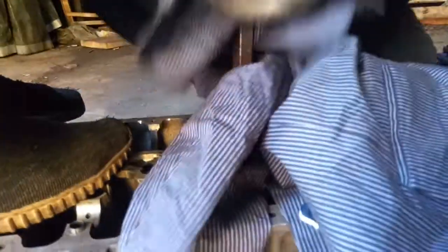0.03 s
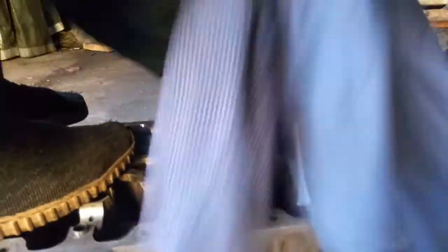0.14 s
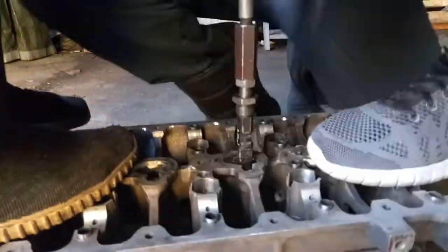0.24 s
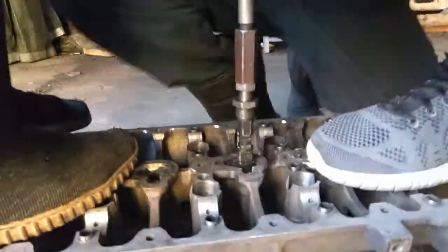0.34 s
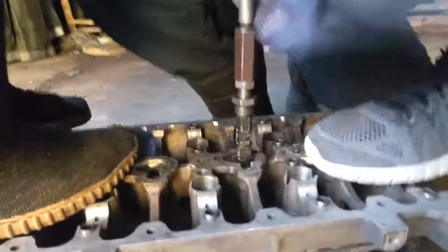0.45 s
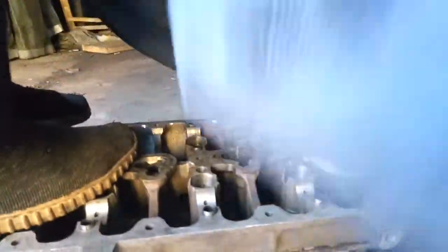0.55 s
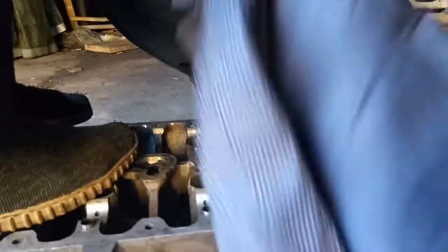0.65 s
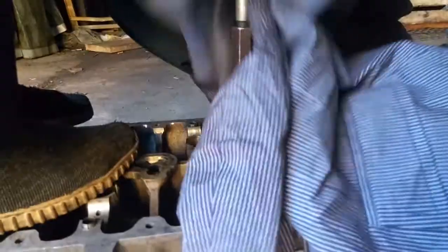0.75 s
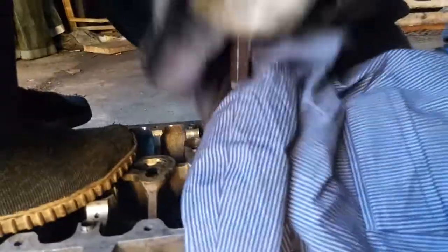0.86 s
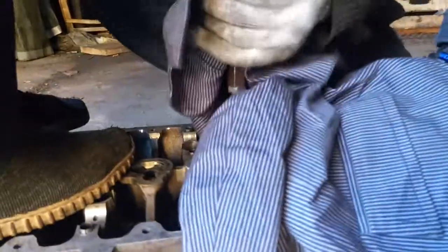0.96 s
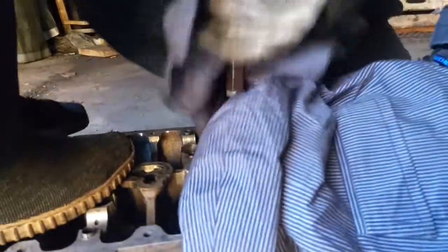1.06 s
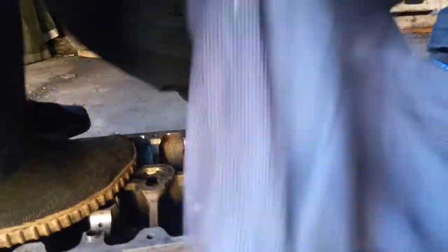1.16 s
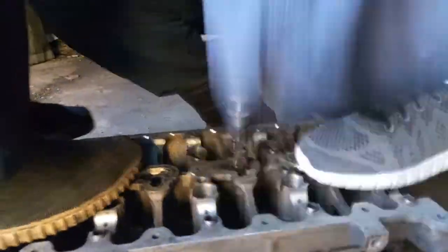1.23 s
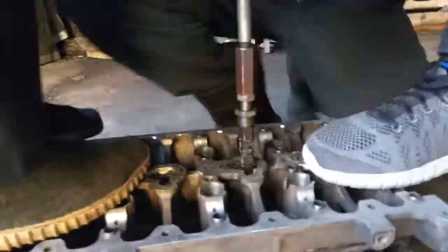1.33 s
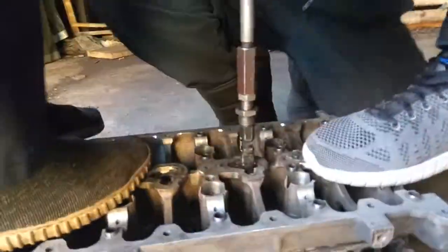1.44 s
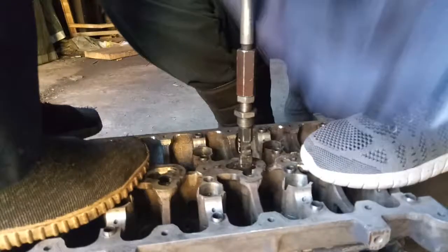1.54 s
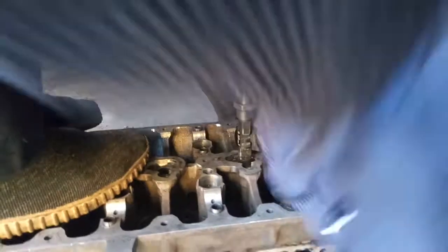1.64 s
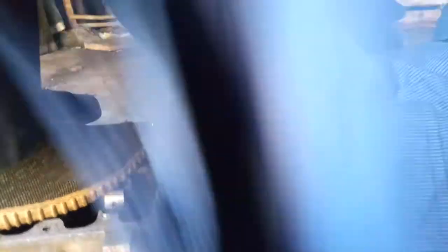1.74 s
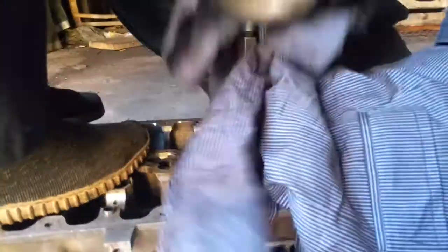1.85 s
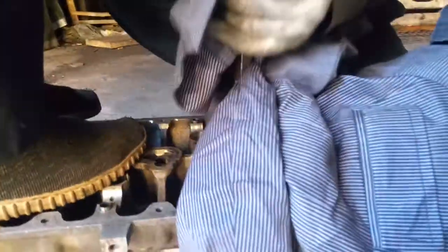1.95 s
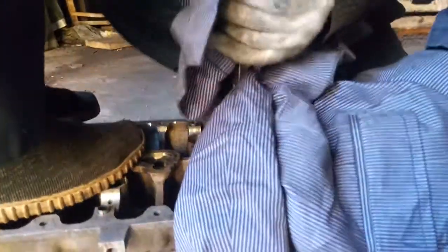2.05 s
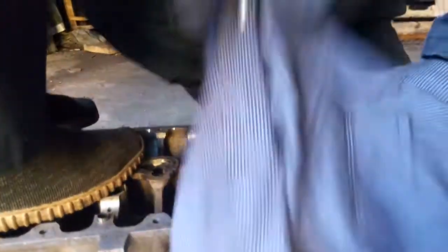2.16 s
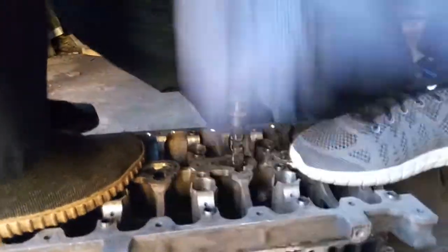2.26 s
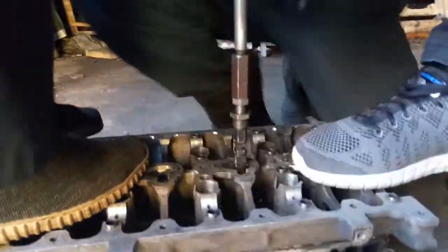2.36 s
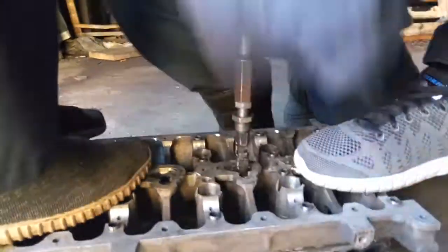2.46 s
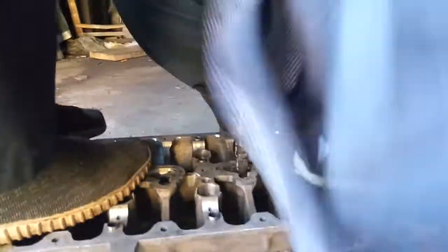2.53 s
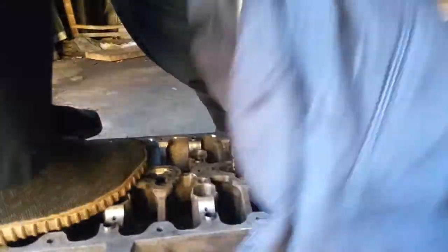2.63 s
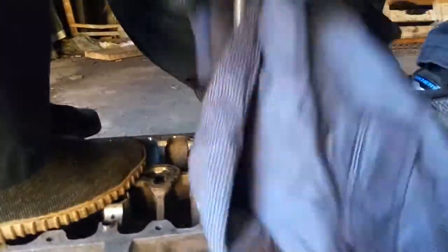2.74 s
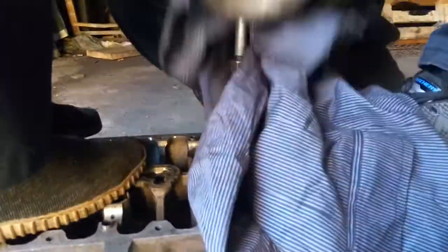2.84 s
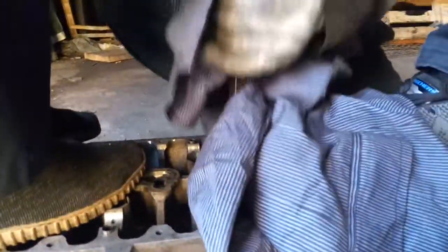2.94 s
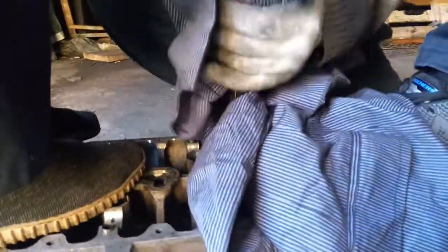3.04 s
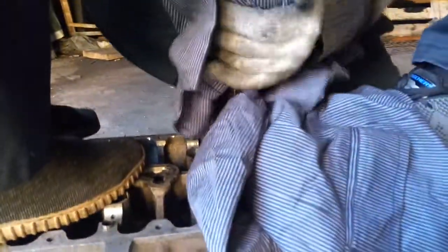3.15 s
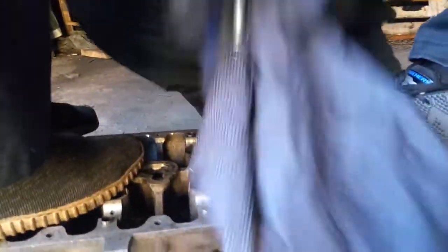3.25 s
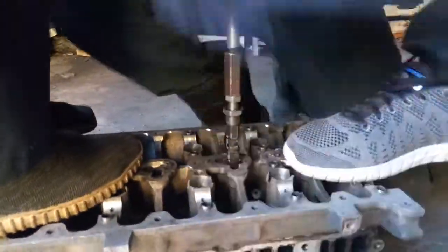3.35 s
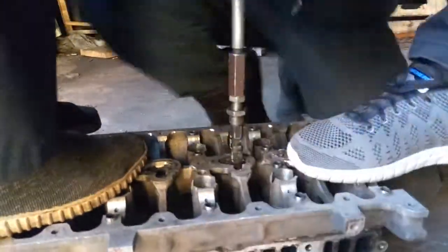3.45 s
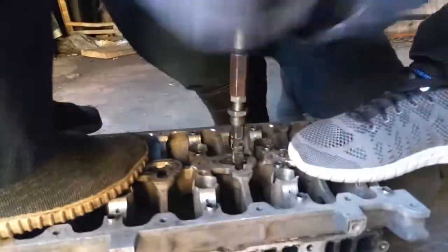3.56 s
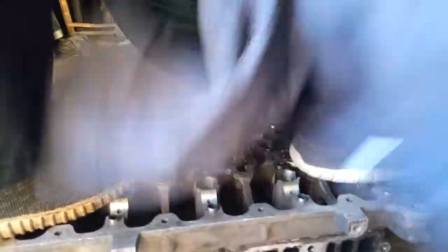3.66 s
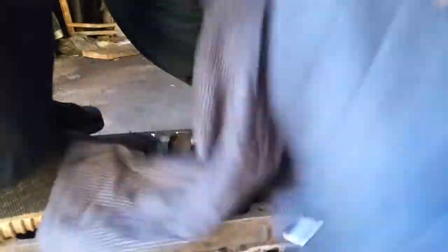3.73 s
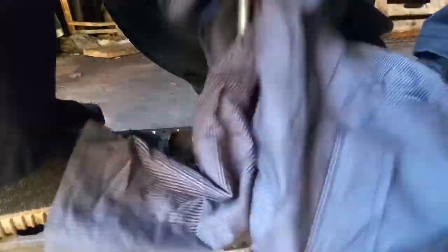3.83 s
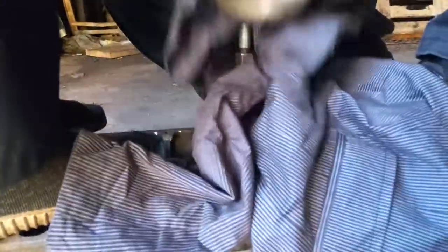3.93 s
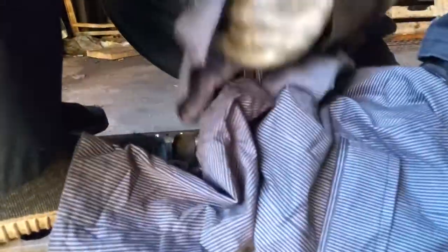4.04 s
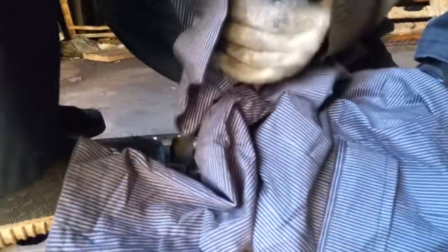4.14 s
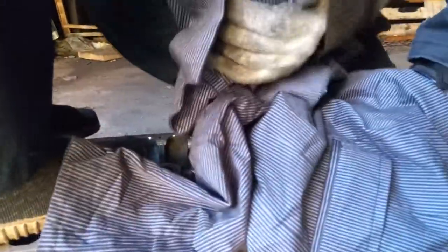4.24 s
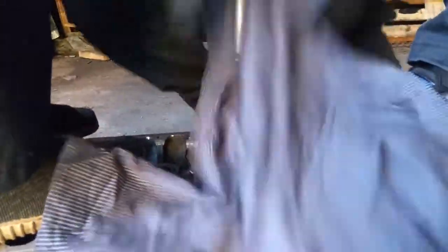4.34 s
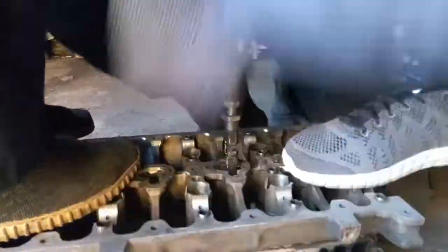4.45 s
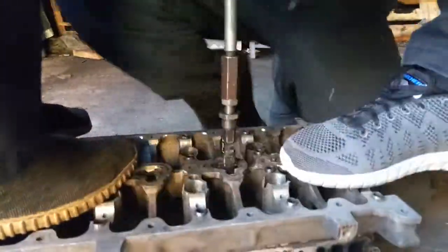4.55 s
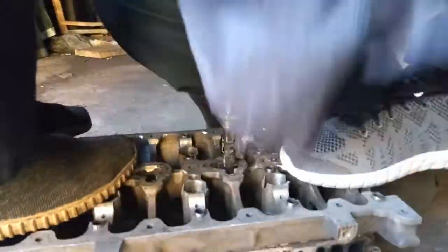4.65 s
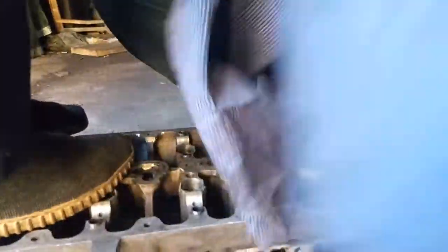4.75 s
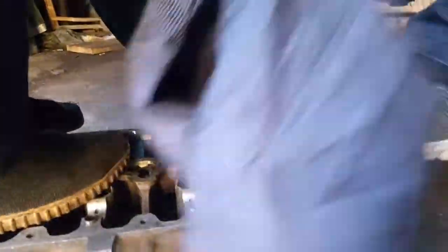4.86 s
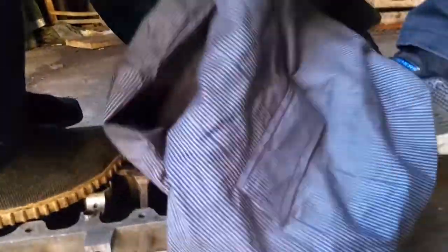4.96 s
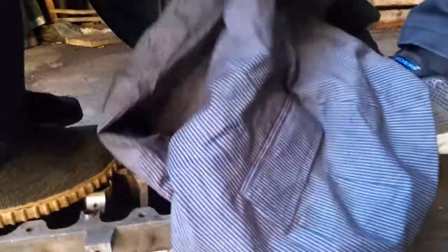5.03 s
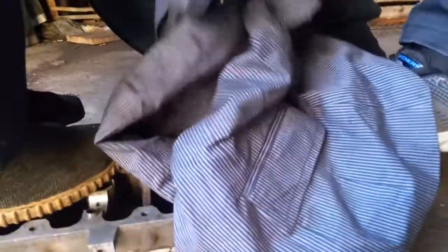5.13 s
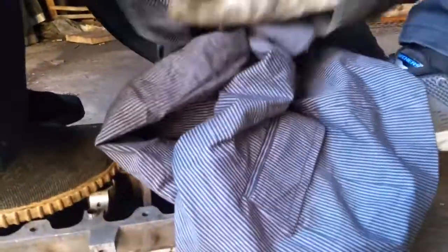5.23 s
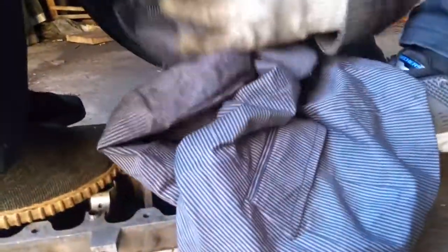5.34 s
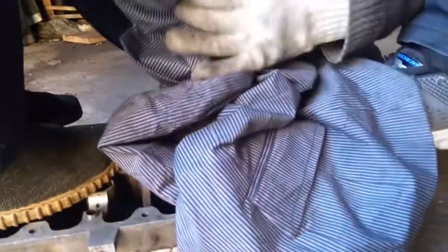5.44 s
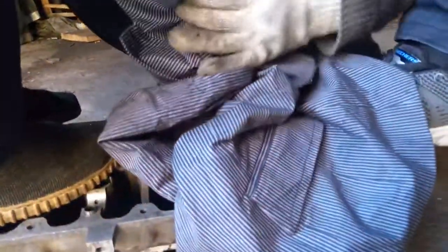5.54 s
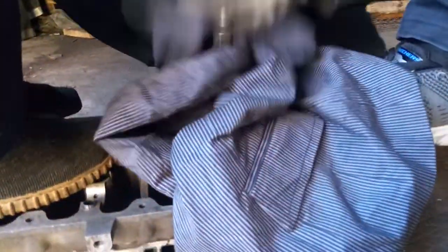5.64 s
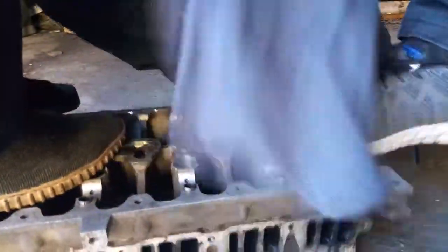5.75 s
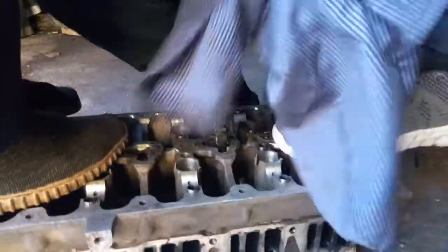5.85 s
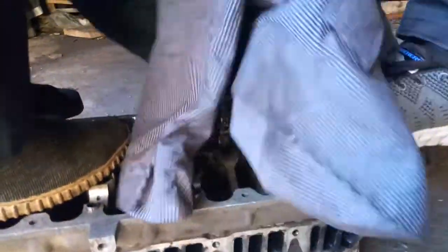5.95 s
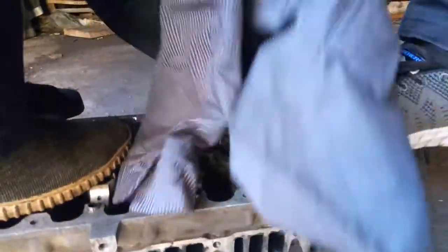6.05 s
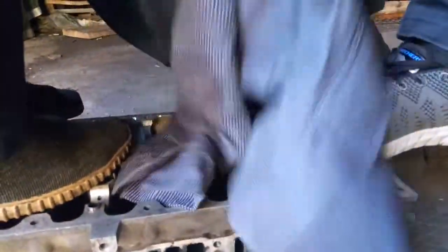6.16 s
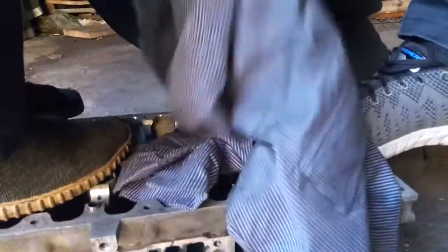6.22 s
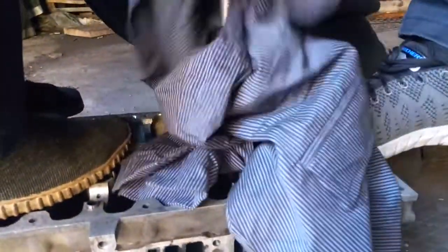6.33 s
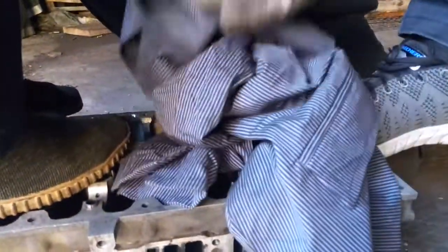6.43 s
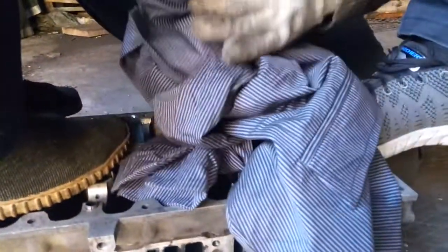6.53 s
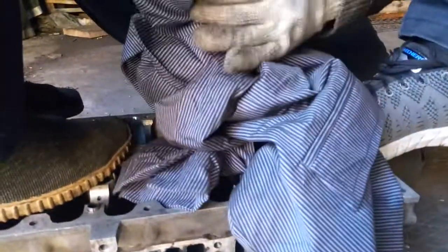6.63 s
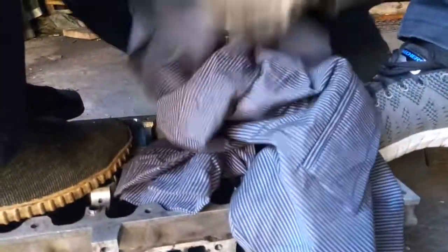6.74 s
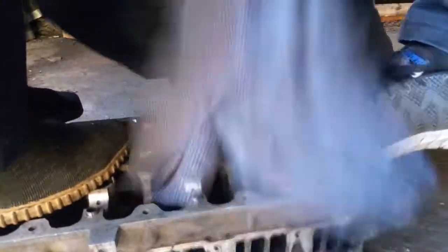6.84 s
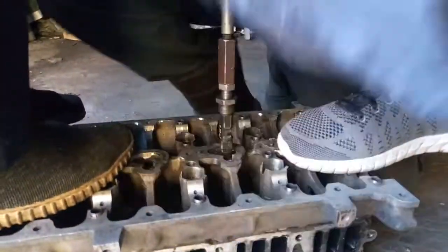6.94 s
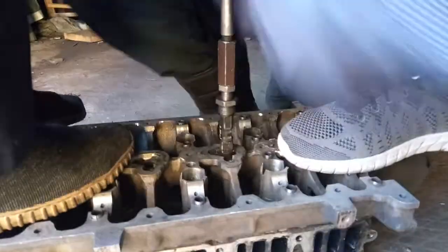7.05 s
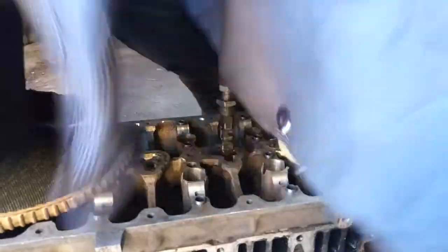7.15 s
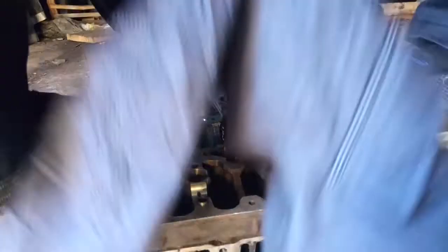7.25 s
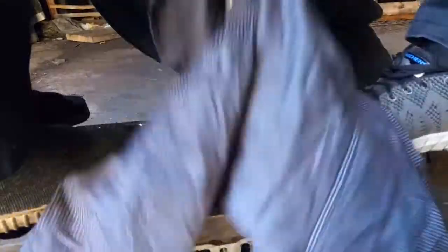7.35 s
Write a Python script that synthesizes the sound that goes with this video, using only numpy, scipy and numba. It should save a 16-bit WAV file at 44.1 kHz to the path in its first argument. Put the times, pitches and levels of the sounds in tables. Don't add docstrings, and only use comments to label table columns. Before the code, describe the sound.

An earlier blow is still fading in a reverberant workshop as cloth rustles close by. At 0.13 s a steel weight scrapes up a rod, knocking and rising in pitch, and slams its stop at 0.27 s: a bright, overloaded crack, a clack about 0.05 s later, ringing steel and echo. A low thud follows at 0.5 s, then the weight slides back with clinks and a falling metallic note. Further slams land near 1.3, 2.3, 3.4, 4.5, 5.8 and 6.9 s; the second is brightest, the fourth duller, the fifth fuller with the loudest clack, the sixth thin and long-ringing, the last softer with longer chatter. A dry snap comes at 3.6 s, faint motor hum swells around 4 s, and a knock and thud sound at 6.4 s. The phone's level drops after each strike; the final slide rattles down until about 7.4 s.

```python
import sys
import numpy as np
from scipy import signal
from scipy.fft import rfft, irfft
from scipy.io import wavfile
from scipy.ndimage import uniform_filter1d
from numba import njit

SR = 44100
rng = np.random.default_rng(int(sys.argv[2]) if len(sys.argv) > 2 else 0)


def unload_wav(signal):
    wavfile.write(
        sys.argv[1],
        SR,
        np.round(np.clip(np.atleast_2d(signal).T, -1, 1) * 32767).astype(np.int16),
    )


def volts_from_decibels(level):
    exponent = np.asarray(level, float) / 20
    return 10 ** exponent


N = 325897
T = np.arange(N) / SR

# t/s, peak level/dB, bass re peak/dB, treble re peak/dB, rebound chatter/s
BLOWS = [
    (0.2689, -6.5, -19.5, -8.5, 0.028),
    (1.307, -6, -28, -6, 0.027),
    (2.336, -5, -31.5, -9.5, 0.019),
    (3.404, -6, -26.5, -30, 0.025),
    (4.496, -5.5, -21.5, -18, 0.027),
    (5.834, -6, -37, -18.5, 0.028),
    (6.94, -8, -21.5, -20.5, 0.05),
]
# start t/s, travel/s, rub level at the stop/dB, singing level/dB, singing from t/s
THROWS = [
    (.126, 0.12, -17, 2.5, 0.17),
    (1.167, 0.13, -16.5, 5.5, 1.19),
    (2.209, 0.1, -10.5, 8, 2.17),
    (3.27, 0.11, -17, 10, 3.23),
    (4.375, .093, -9.5, 9.5, 4.378),
    (5.693, 0.12, -17, 1.5, 5.735),
    (6.808, 0.1, -14, 6.5, 6.8),
]


def read(points, hz):
    points = np.array(points)
    return np.interp(np.log(np.maximum(hz, 1)), np.log(points[:, 0]), points[:, 1])


def unit(x):
    return x / np.sqrt(np.mean(x ** 2))


def noise(points, size=N):
    colour = volts_from_decibels(read(points, np.fft.rfftfreq(size, 1 / SR)))
    return unit(irfft(rfft(rng.standard_normal(size)) * colour, size))


def walk(rate):
    k = int(SR / rate)
    held = np.repeat(rng.standard_normal(N // k + 1), k)
    return unit(uniform_filter1d(held, k)[:N])


def fade(s, t60, rise=0.00078):
    age = np.maximum(T - s, 0)
    return (1 - np.exp(-age / rise)) * np.exp(-np.log(1000) * age / t60)


def swell(s, length):
    return np.sin(np.pi * np.clip((T - s) / length, 0, 1))


def tone(hz, phase=0):
    return np.sin(2 * np.pi * hz * T + phase)


@njit
def ring(x, hz, t60):
    y, z, r = np.empty(len(x)), 0j, np.exp(-np.log(1000) / (t60 * SR))
    for i in range(len(x)):
        w = 2 * np.pi * hz[i] / SR
        z = z * r * complex(np.cos(w), np.sin(w)) + x[i]
        y[i] = z.imag
    return y


@njit
def follow(x, attack, release):
    y, e = np.empty(len(x)), 1e-6
    for i in range(len(x)):
        e += (abs(x[i]) - e) * (attack if abs(x[i]) > e else release)
        y[i] = e
    return y


def chatter_decay():
    return [volts_from_decibels(db) * np.exp(-(np.maximum(T - s, 0) / chatter_s) ** 1.14) * fade(s - .0004, 0.62, 0.00011)
            for s, db, _, _, chatter_s in BLOWS]


def crack(shape):
    # f/Hz, level per Hz/dB
    crack_tone = [(35, -39.5), (60, -10), (469, -3.5), (1140, -4), (1470, -3), (2250, -7), (3670, -8.5),
                  (4030, -10.5), (5090, 0.5), (6280, 1), (7750, -10.5), (8510, -9), (13600, -16.5),
                  (14900, -9), (16000, -54)]
    treble_tone = [(6000, -37.0), (8000, -10.0), (9500, 1.5), (11000, -7), (13000, -25.0), (15500, 5.0),
                   (16000, -18.0)]
    chatter = volts_from_decibels(4.5 * walk(450))
    first = sum(volts_from_decibels(row[1] - 2.0) * fade(row[0] - .0004, 0.018, 0.00017) for row in BLOWS)
    body = volts_from_decibels(-2.2) * noise(crack_tone) * (chatter * sum(shape) + first)
    treble = noise(treble_tone) * sum(volts_from_decibels(row[3] - 1.0) * e for row, e in zip(BLOWS, shape))
    return body + treble


def face_notes():
    # t/s, f/Hz, level/dB, t60/s
    face_modes = [(0.27, 5870, -6.5, 0.15), (.27, 5260, -12, 0.089), (1.307, 5560, -10.5, .07),
                  (2.338, 5550, -10, .06), (2.338, 4990, -10.5, .07), (3.406, 6310, -8, .06),
                  (4.497, 6460, -11.5, 0.065), (4.499, 5250, -11, .05), (5.838, 6450, -7, .07),
                  (5.837, 5250, -12, .08), (6.941, 5185, -7, 0.11), (3.408, 3705, -16, 0.19),
                  (3.416, 4850, -13, 0.118), (1.315, 4850, -12, 0.13), (4.505, 4850, -10.5, .15)]
    return sum(volts_from_decibels(db + 4.4 * walk(250)) * fade(s, t60, 0.0013) * tone(hz, 1.2 * walk(200))
               for s, hz, db, t60 in face_modes)


def thump():
    thump_tone = [(50, -21.0), (110, 6.5), (200, 0.0), (400, -41.0), (1000, -56.5)]
    return noise(thump_tone) * sum(volts_from_decibels(db + bass_db + 15.0) * fade(s, 0.089, 0.003)
                                   for s, db, bass_db, _, _ in BLOWS)


def struck_steel():
    # f/Hz, level/dB, t60/s
    steel_modes = [(450, -5, 0.039), (540, -15.5, 0.16), (676, -7.5, 0.044), (904, -23.5, 0.3),
                   (1460, -19, 0.15), (1944, -14.5, 0.1), (2590, -16, 0.11), (2977, -13.5, 0.15),
                   (3705, -15.5, 0.18), (4130, -21, 0.13), (4650, -10, 0.098), (5320, -11.5, 0.091),
                   (5840, -14, 0.052), (5820, -17, 0.11), (6370, -9, 0.16), (6800, -9.5, 0.05),
                   (9000, -12, 0.082), (9960, -15.5, 0.054), (11360, -19, .05)]
    short = sum(volts_from_decibels(row[1]) * fade(row[0], 0.06) for row in BLOWS)
    return sum(volts_from_decibels(db) * ring(short * rng.standard_normal(N), hz * (1 + 0.011 * walk(80)), t60)
               for hz, db, t60 in steel_modes)


def long_notes():
    # t/s, f/Hz, level/dB, t60/s
    singing = [(0.268, 5877, -14, 0.34), (1.307, 5160, -23, 0.81), (1.306, 5340, -20, 0.42),
               (2.335, 5050, -19.5, 0.82), (3.405, 6110, -19.5, 0.18), (4.497, 3705, -22.5, 0.54),
               (2.336, 3705, -27, 0.78), (2.336, 2660, -26.5, 0.91), (6.94, 2975, -25, 0.65),
               (6.94, 2660, -26, 0.88), (4.498, 5590, -33.5, 0.37), (5.836, 5864, -13, 0.6),
               (5.837, 2586, -23.5, 0.86), (6.938, 4838, -17.5, 0.73), (6.94, 1460, -22, 0.85)]
    # f/Hz, level/dB, t60/s
    rod_notes = [
        (4838, -12.5, 0.22),
        (3705, -20, 0.3),
        (1464, -26.5, 0.85),
        (2975, -31, 0.3),
    ]
    notes = sum(volts_from_decibels(db + 5.5 * walk(60)) * fade(s, t60) * tone(hz, 1.4 * walk(40))
                for s, hz, db, t60 in singing)
    for hz, db, t60 in rod_notes:
        rung = sum(fade(row[0], t60, 0.0072) for row in BLOWS)
        notes = notes + volts_from_decibels(db + 2. * walk(30)) * rung * tone(hz, .5 * walk(30))
    return notes


def boom():
    boom_db = [-12.5, -14, -12.5, -13, -13.5, -11.5, -11]
    boom_tone = [(100, -63.5), (300, -17.5), (400, -5.5), (600, -7.0), (900, -16.5), (1500, -20.0), (4000, -93.5)]
    return noise(boom_tone) * sum(volts_from_decibels(db) * fade(row[0], 0.76, 0.045) for row, db in zip(BLOWS, boom_db))


def rebound_clacks():
    # t/s, peak level/dB, f/Hz
    rebounds = [
        (0.312, -13, 1837),
        (1.358, -12, 1795),
        (2.387, -9.5, 1783),
        (3.4512, -11.5, 1880),
        (4.55, -6, 1690),
        (5.8866, -18.5, 2130),
        (6.981, -8, 1970),
    ]
    clack_noise = noise([(400, -10.0), (800, 6.5), (1800, 8.5), (3500, -3.5), (4500, -20), (9000, -72.0)])
    return sum(volts_from_decibels(db + 8.5) * fade(s, 0.017, 0.0006) * (tone(hz) + 0.56 * clack_noise)
               for s, db, hz in rebounds)


def slams():
    # f/Hz, level per Hz/dB
    echo_tone = [(35, -62), (60, -1.5), (274, -10.5), (408, -1.5), (842, -7.5), (991, -8), (1250, -17.5),
                 (1470, -10), (2190, -13), (2650, -10.5), (3420, -16), (5720, -2.5), (8200, -16),
                 (9500, -12.5), (12500, -25), (15000, -21.5)]
    shape = chatter_decay()
    steel = struck_steel()
    near = crack(shape) + thump() + rebound_clacks() + long_notes() + face_notes() + boom()
    push = noise(echo_tone) * volts_from_decibels(2.5) * sum(shape)
    return near + volts_from_decibels(-20.0) * steel, volts_from_decibels(-3.0) * push + volts_from_decibels(-40.5) * steel


def travel():
    # start t/s, travel/s
    returns = [
        (.66, .37),
        (1.66, .35),
        (2.676, 0.41),
        (3.68, 0.49),
        (4.91, .62),
        (6.208, 0.41),
        (7.2, 0.47),
    ]

    def share(row):
        return np.clip((T - row[0]) / row[1], 0, 1)

    up = sum(share(row) ** 1.9 for row in THROWS)
    down = sum(share(row) ** 2 * (3 - 2 * share(row)) for row in returns)
    return up - down


def rubbing():
    # t/s, rub level/dB, t60/s, singing level/dB
    catches = [(.63, -33, 0.86, -16.5), (.766, -35, 0.46, -10), (.852, -38.5, 0.89, -16),
               (.92, -52.5, .3, 7), (1.631, -24.5, 0.86, -23.5), (1.85, -49.5, 0.84, -7.5),
               (1.887, -51.5, .2, 9.5), (2.67, -25.5, 0.85, -21.5), (2.895, -41, 1.7, -16.5),
               (3.73, -28, 0.65, -13), (3.85, -54, .4, 3), (3.93, -55, 1, -6), (4.008, -57, 0.2, 10),
               (4.08, -58, 0.32, 8), (4.999, -38, 1, -28), (5.22, -39, 0.32, -12.5),
               (6.281, -33, 0.81, -16), (6.375, -39, 1.3, -12), (7.19, -36, 0.14, -5),
               (7.33, -33, 0.71, -11)]
    touch_db, grip_db, grip_s = -48.5, -31.5, 0.038
    free_s = 0.0047
    rub, sing = 0, 0
    for (s, _, stop_db, sing_db, sing_s), blow in zip(THROWS, BLOWS):
        end = blow[0] - free_s
        up = volts_from_decibels(np.interp(T, [s, s + grip_s, end], [touch_db, grip_db, stop_db])) * (T > s) * (T < end)
        rub = rub + up
        sing = sing + volts_from_decibels(sing_db - 10.5) * up ** 0.65 * np.clip((T - sing_s) / .012, 0, 1)
    for s, db, t60, sing_db in catches:
        down = volts_from_decibels(db) * fade(s, t60, 0.0035)
        rub = rub + down
        sing = sing + volts_from_decibels(sing_db) * down
    return uniform_filter1d(rub, 300), uniform_filter1d(sing, 300)


def rattling(rub):
    taps = (rng.random(N) < 260 / SR) * volts_from_decibels(1. * rng.exponential(size=N))
    bursts = signal.lfilter([1], [1, -np.exp(-1 / (0.002 * SR))], taps)
    return unit(uniform_filter1d(bursts, size=90)) * rub


def knocking():
    # t/s, peak level/dB, f/Hz, share of that pitch/dB
    knocks_up = [(0.177, -24, 4950, -12), (0.215, -19.5, 3115, -1.5), (0.242, -2, 4830, -13.5),
                 (1.223, -12.5, 3585, -6.5), (1.258, -24, 3094, 6.5), (0.174, -34, 5620, 5),
                 (0.2, -21, 4510, -2.5), (2.271, -26.5, 6800, 2), (4.478, -22, 4315, 9),
                 (5.762, -26, 3990, 4), (5.775, -29.5, 2610, 4), (1.241, -14, 4260, -4.5),
                 (1.258, -10, 6520, -2), (1.281, -1, 6730, -9), (2.239, -18, 3185, -7),
                 (2.254, -16.5, 3600, -9.5), (2.272, -10, 2575, -6.5), (2.2866, -15, 6440, -0.5),
                 (2.305, -4.5, 5180, -11), (2.323, -1, 5500, -12), (3.2784, -26, 4080, -12),
                 (3.305, -20, 1830, -10), (3.319, -20.5, 6060, -11.5), (3.3542, -13.5, 6570, -4),
                 (3.3759, -3, 5330, -12.5), (3.388, -1.5, 6450, -11), (4.4155, -13, 5310, -9.5),
                 (4.434, -11, 7000, -11.5), (4.449, -9.5, 5500, -7), (4.472, -7, 6640, -6),
                 (4.4848, 0.5, 4650, -12.5), (5.744, -33.5, 3870, -7), (5.7738, -21.5, 5060, 0),
                 (5.7903, -18, 6480, 4), (5.805, -10, 6530, -6.5), (5.816, -5, 5200, -10),
                 (5.824, -0.5, 4640, -14.5), (6.839, -19.5, 3050, -6), (6.8674, -20, 3960, 1),
                 (6.885, -18, 2850, -4), (6.906, -14, 4650, -8), (6.9254, 1.5, 4150, -16.5)]
    # t/s, peak level/dB, f/Hz, share of that pitch/dB
    knocks_down = [(0.624, -23, 1830, -6), (0.651, -19.5, 5050, -8), (0.768, -30, 4970, -1),
                   (0.853, -28, 4970, 1.5), (1.668, -14, 1793, -9), (1.698, -28.5, 4200, 3),
                   (1.7814, -16.5, 4930, -17), (1.855, -23.5, 4160, -5), (2.6985, -29.5, 4970, 5.5),
                   (2.811, -22.5, 3950, -8), (2.8968, -23.5, 4200, -6), (3.7596, -28.5, 4230, -0.5),
                   (3.82, -25.5, 4270, -10), (5.228, -34, 4300, -10), (6.2777, -22, 2150, -13),
                   (6.297, -26.5, 1830, 0.5), (6.3485, -28, 4200, -8), (6.381, -14, 1830, -3.5),
                   (6.432, -17, 4100, -13), (7.4, -18, 5900, -14)]
    # t/s, peak level/dB, f/Hz
    clinks = [(.652, -32, 1830), (.654, -34.5, 2600), (.65, -33.5, 4400), (.77, -35.5, 3600),
              (.77, -37.5, 1830), (.776, -35, 890), (.793, -31, 4970), (.817, -34, 2750), (.853, -33, 1100),
              (.853, -33.5, 4100), (.88, -34, 4970), (.885, -32.5, 760), (.932, -35.5, 1830),
              (.95, -33.5, 2750), (.953, -34, 770), (1.63, -27, 1793), (1.665, -25, 4200),
              (1.678, -24, 4880), (1.695, -31, 2550), (1.72, -34, 2450), (1.825, -36, 1830),
              (1.89, -37, 2700), (1.905, -35, 1830), (1.945, -33.5, 1820), (2.69, -31, 4100),
              (2.698, -29.5, 2600), (2.75, -34, 2500), (2.765, -36.5, 4280), (2.87, -37, 5050),
              (2.899, -33.5, 2150), (2.91, -36, 750), (2.96, -39, 2550), (2.978, -41.5, 3150),
              (3.01, -41, 4250), (3.76, -32.5, 5000), (3.757, -37.5, 3250), (3.764, -29, 1850),
              (3.79, -31, 1830), (3.805, -33, 5000), (3.815, -30, 1830), (3.868, -32, 1830),
              (3.905, -36, 1900), (3.996, -31.5, 722), (4.055, -34.5, 1830), (4.085, -42, 2750),
              (4.088, -46.5, 4250), (4.135, -47, 4150), (4.13, -47.5, 2600), (6.305, -34, 3950),
              (6.315, -36, 4200), (6.381, -18.5, 6150), (6.381, -30, 3550), (6.385, -36, 3250),
              (6.381, -36, 4500), (6.44, -30, 1830), (6.452, -30, 3800), (6.493, -38, 2350),
              (6.537, -38, 1800), (7.33, -32, 2580), (7.365, -33, 4838)]
    up_t60_s, down_t60_s, clink_t60_s = 0.03, 0.047, .07
    hits = [(*row, up_t60_s) for row in knocks_up] + [(*row, down_t60_s) for row in knocks_down]
    waver = 0.79 * walk(150)
    force, notes = 0, 0
    for s, db, hz, own_db, t60 in hits:
        force = force + volts_from_decibels(db - 7) * fade(s, 1.52 * t60, 0.0026)
        notes = notes + volts_from_decibels(db + own_db) * fade(s, 1.47 * t60, 0.00071) * tone(hz, waver)
    for s, db, hz in clinks:
        force = force + volts_from_decibels(db - 6.5) * fade(s, clink_t60_s, 0.002)
        notes = notes + volts_from_decibels(db) * fade(s, clink_t60_s, 0.0017) * tone(hz, waver)
    return force, notes


def weight_modes(rub, grit, blows, back):
    # f/Hz, level thrown up/dB, level sliding back/dB, t60/s
    modes = [(734, -12.5, -8, 0.026), (1343, -30, -11, 0.041), (1822, -13, -10, 0.057),
             (2557, -18, -12.5, 0.056), (3660, -20.5, -20.5, 0.018), (4280, -9.5, -11, 0.039),
             (4930, -6, -14.5, 0.051), (6340, -12, -18, 0.073), (6680, -7.5, -16.5, 0.02),
             (8500, -26, -42, 0.025), (9680, -20, -29.5, 0.063), (11200, -23.5, -42.5, 0.049)]
    total = 0
    for hz, up_db, back_db, t60 in modes:
        rubbed = volts_from_decibels(5.3 * walk(30) - 2.5) * rub * grit
        struck = volts_from_decibels(2.0 * walk(25)) * blows * rng.standard_normal(N)
        drive = volts_from_decibels(np.where(back, back_db, up_db)) * (rubbed + struck)
        total = total + ring(drive, hz * (1 + 0.011 * walk(20)), t60)
    return total


def gliding_rod(sing, grit, blows, back):
    # multiple of the fourth-mode pitch, level/dB
    bending = [
        (.28, -8),
        (0.589, -5),
        (1., -3),
        (1.491, -10.5),
    ]
    # f/Hz, level/dB
    radiate = [(600, -41), (800, -0.5), (1200, -33.5), (1700, -37.5), (2500, -4.5), (3500, 3), (4600, -1.5),
               (5200, -14), (7000, -41)]
    bottom_hz, stop_hz = 2580, 8700
    pitch_hz = bottom_hz * (stop_hz / bottom_hz) ** travel()
    turns = 2 * np.pi * np.cumsum(pitch_hz) / SR
    patchy_db = np.where(back, 6., 1.5)
    total = 0
    for k, db in bending:
        steady = volts_from_decibels(15.0 + patchy_db * walk(55)) * sing * np.sin(k * turns + 1.2 * walk(90))
        drive = 0.45 * sing * grit + 0.5 * blows * rng.standard_normal(N)
        rough = ring(drive, np.minimum(k * pitch_hz, .45 * SR), 0.054)
        total = total + volts_from_decibels(db + read(radiate, k * pitch_hz)) * (steady + rough)
    return total


def slide():
    scrape_tone = [(300, -27), (1500, -20.5), (4000, -3.5), (6500, -8), (7500, -21.5), (12000, -28), (15000, -31.0)]
    rub, sing = rubbing()
    thrown = [(T > row[0]) & (T < blow[0]) for row, blow in zip(THROWS, BLOWS)]
    back = ~np.any(thrown, axis=0)
    grit = unit(rng.standard_normal(N) * volts_from_decibels(4.0 * np.minimum(rng.exponential(size=N), 6.)))
    knock_force, knock_notes = knocking()
    blows = volts_from_decibels(np.where(back, -6., -11.)) * rattling(rub) + knock_force
    fixed = weight_modes(rub, grit, blows, back)
    glide = gliding_rod(sing, grit, blows, back)
    scrape = (0.034 * rub + blows) * volts_from_decibels(np.where(back, -4., 0)) * noise(scrape_tone)
    return volts_from_decibels(-26.0) * fixed + volts_from_decibels(-21.5) * glide + knock_notes + volts_from_decibels(-6.0) * scrape


def pallet_drops():
    # t/s, peak level/dB, f/Hz
    drops = [
        (0.513, -14.5, 119),
        (1.675, -24, 122),
        (2.698, -27, 115),
        (5.024, -38, 1100),
        (6.381, -27, 282),
    ]
    knock_tone = [(40, -17.0), (80, -2.0), (250, -8.5), (700, -18.0), (2000, -44)]
    thuds = sum(volts_from_decibels(db - 5) * fade(s, 0.23, 0.0076) * np.sin(2 * np.pi * hz * (T - s)) for s, db, hz in drops)
    return thuds + noise(knock_tone) * sum(volts_from_decibels(db - 7.0) * fade(s, 0.19, 0.0077) for s, db, _ in drops)


def jacket():
    # start t/s, length/s, level/dB
    swishes = [(0.02, 0.81, -42), (0.56, 0.65, -51), (1.06, 0.65, -44.5), (1.3, 0.72, -47),
               (2.302, .16, -48), (2.55, 0.44, -54), (3.606, 0.64, -57), (4.48, 0.31, -44),
               (4.737, 0.77, -53.5), (5.8, 0.22, -54), (5.981, 0.64, -60.5), (1.985, 0.059, -57),
               (5.396, 0.24, -64), (6.873, 0.15, -38), (7.15, 0.5, -54), (3.22, .1, -56), (4.32, 0.18, -52),
               (1.7, 0.46, -65)]
    # t/s, peak level/dB
    snaps = [(0.2004, -38), (0.4454, -28), (.504, -44), (.597, -36), (0.6489, -39), (0.883, -35),
             (1.6681, -34), (1.7514, -35), (1.9925, -42), (2.6953, -65), (3.25, -45), (3.613, -19),
             (3.9704, -51), (4.3065, -55), (4.364, -43.5), (4.6794, -31.5), (5.026, -52), (5.3772, -48),
             (6.3066, -45)]
    # f/Hz, level per Hz/dB
    cloth_tone = [(500, -48), (1500, -18), (3000, -6), (5000, -1.5), (7000, -8.5), (9000, -15.5),
                  (13000, -16.5), (15000, -8), (15800, -6), (16200, -42.5)]
    snap_tone = [(2000, -22), (5000, 6.0), (10000, 7), (15500, 1.5), (16000, -29.5)]
    swish = volts_from_decibels(-68) + sum(volts_from_decibels(db) * swell(s, length) ** 2 for s, length, db in swishes)
    rustle = noise(cloth_tone) * swish * volts_from_decibels(1 + 2. * walk(25) + 2.5 * walk(7))
    return rustle + noise(snap_tone) * sum(volts_from_decibels(db) * fade(s, 0.025) for s, db in snaps)


def hall(x):
    # f/Hz, t60/s
    hall_t60 = [(100, 0.51), (400, 0.99), (1500, 1.1), (4000, 0.87), (6000, 0.67), (11000, 0.42),
                (16000, 0.43)]
    size = 2 * SR
    age = T[:size]
    hz = np.fft.rfftfreq(size, 1 / SR)
    white = rfft(rng.standard_normal(size))
    echo = 0
    for centre in 50 * 2 ** np.arange(0, 8.6, .5):
        band = np.maximum(1 - 2 * abs(np.log2(np.maximum(hz, 1) / centre)), 0)
        echo = echo + irfft(white * band, size) * np.exp(-np.log(1000) * age / read(hall_t60, centre))
    echo = echo * (1 - np.exp(-age / 0.0077))
    return signal.fftconvolve(x, echo / np.sqrt(np.sum(echo ** 2)))[:N]


def shop():
    # start t/s, length/s, f/Hz, level/dB
    hums = [
        (-.2, 0.73, 136.4, -41),
        (0.248, 1, 133.8, -49),
        (3.495, 1.5, 99.6, -41),
        (4.501, 1.2, 102.1, -47.5),
    ]
    # f/Hz, level per Hz/dB
    shop_tone = [(15, -43), (25, -22), (70, -2.5), (120, -5.5), (250, -6.5), (400, -14.5), (700, -14.5),
                 (1400, -20.5), (2200, -26.5), (4700, -38.5), (6500, -36.5), (8500, -57), (13000, -65),
                 (15000, -44)]
    earlier_tone = [(500, -13.5), (2500, -3), (4500, -1.0), (6500, -8.5), (8500, -39.5)]
    motors = 0
    for s, length, hz, db in hums:
        phase = 2 * np.pi * np.cumsum(hz * (1 + 0.011 * walk(5))) / SR
        motors = motors + np.sqrt(2) * volts_from_decibels(db + 2.8 * walk(6)) * swell(s, length) * np.sin(phase)
    air = noise(shop_tone) * volts_from_decibels(-43.5 + 0.48 * walk(8.7))
    earlier = noise(earlier_tone) * volts_from_decibels(-51.5) * fade(-0.0092, 1.4)
    return air + motors + earlier


def scene():
    blow, push = slams()
    rod = slide()
    near = blow + rod + jacket() + pallet_drops()
    return (near + hall(push + volts_from_decibels(-19) * rod) + shop())[None]


def roll_off(x):
    return signal.sosfilt(signal.butter(12, 16790, fs=SR, output="sos"), x)


def record(dry):
    x = dry[0]
    level = follow(x, 1 / (0.019 * SR), 1 / (0.02 * SR))
    late = np.interp(T - .016, T, level)
    gain = uniform_filter1d(np.minimum(volts_from_decibels(-19) / late, 1) ** 0.99, 300)
    x = signal.sosfilt(signal.ellip(8, .2, 50, 15520, fs=SR, output="sos"), x * gain)
    x = x / (1 + abs(x / .87) ** 5) ** (1 / 5)
    x = x - .7 * signal.sosfiltfilt(signal.butter(6, 15700, "high", fs=SR, output="sos"), x)
    return roll_off(x[None])


dry = scene()
out = record(dry)
unload_wav(out)
```